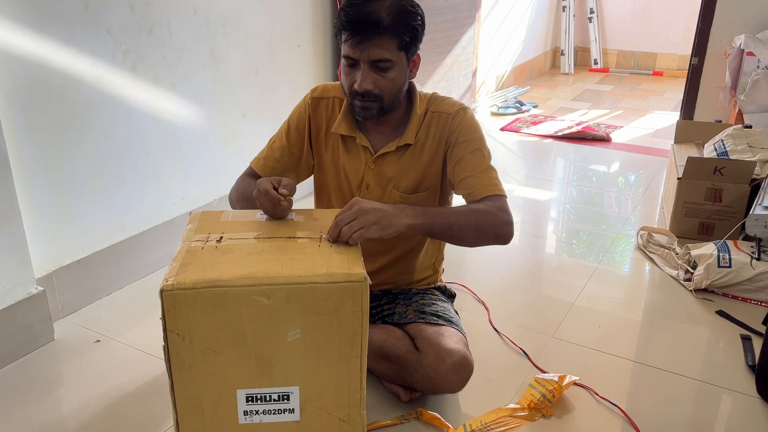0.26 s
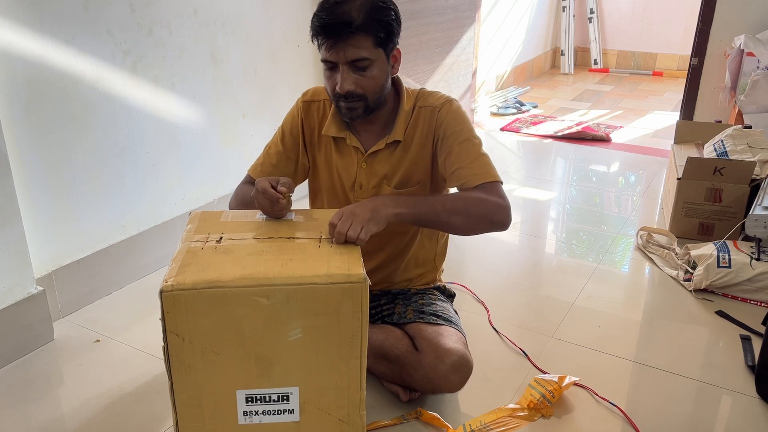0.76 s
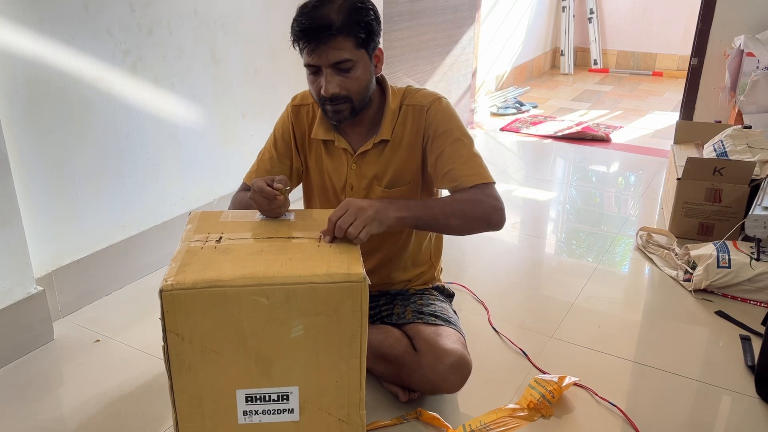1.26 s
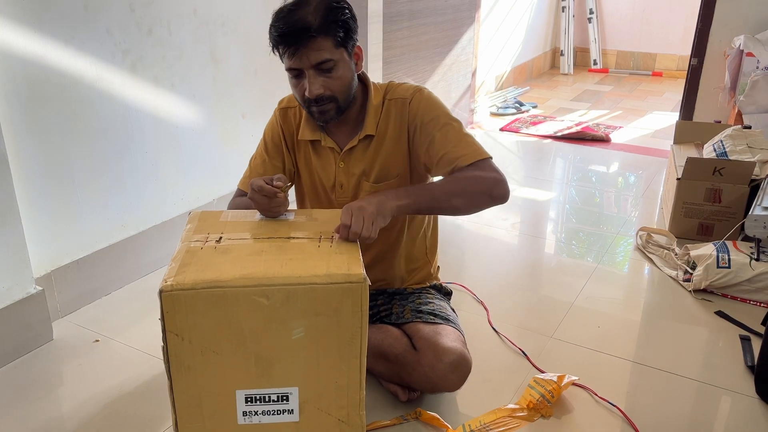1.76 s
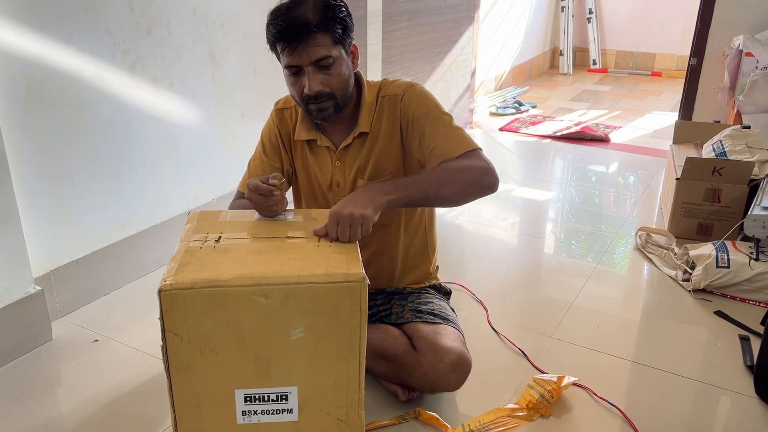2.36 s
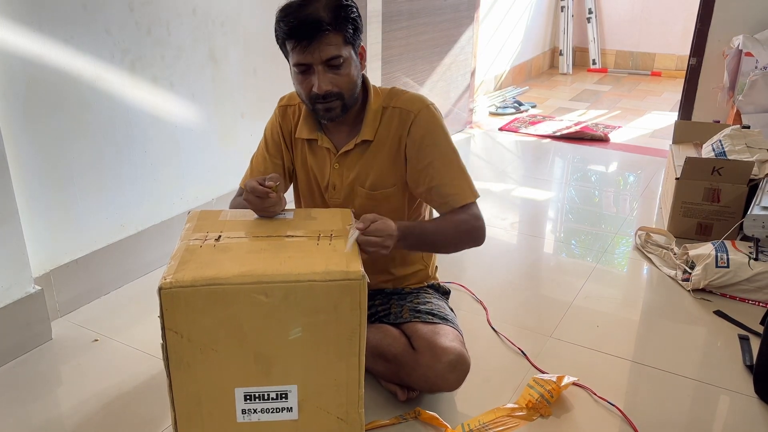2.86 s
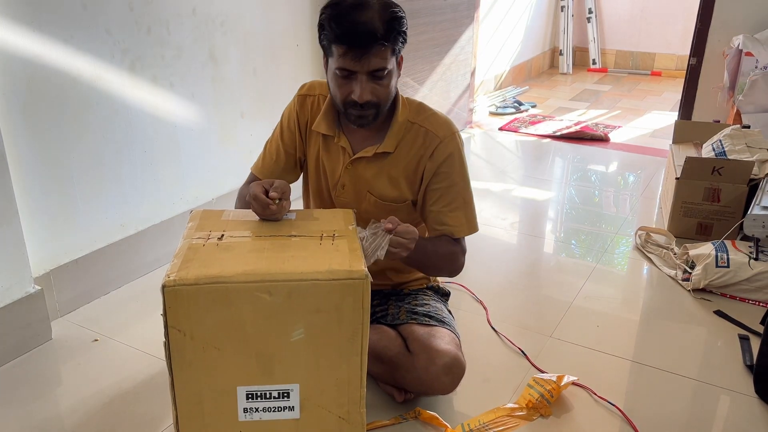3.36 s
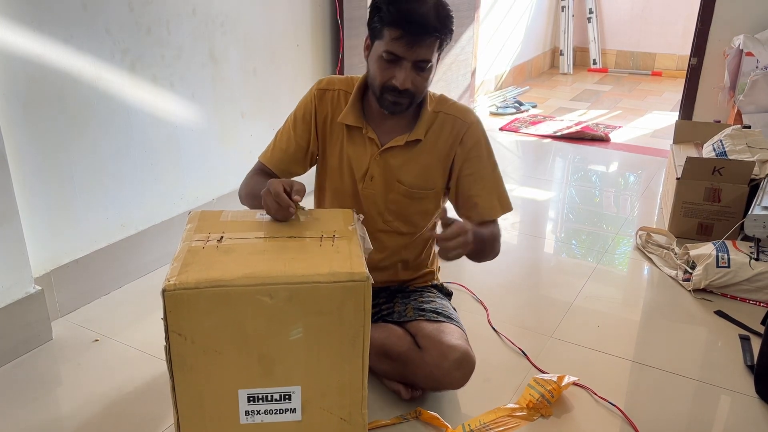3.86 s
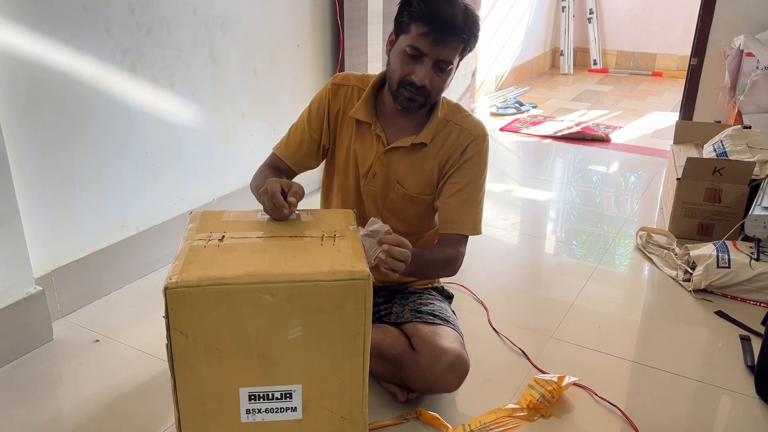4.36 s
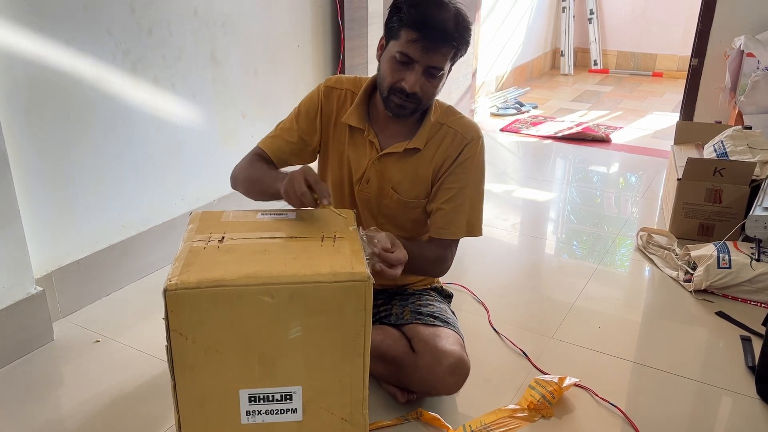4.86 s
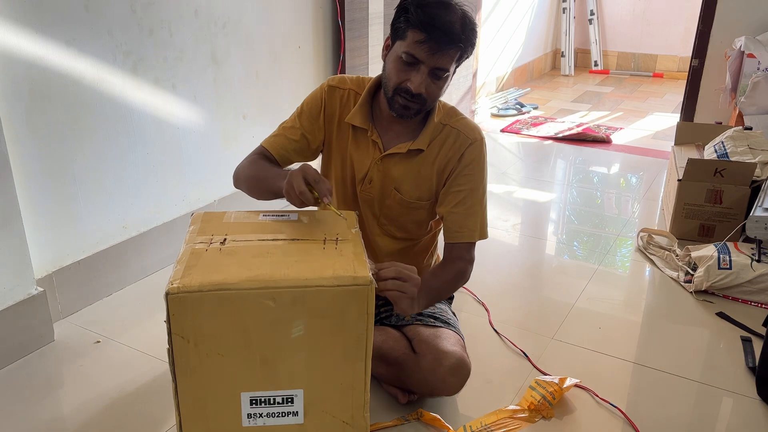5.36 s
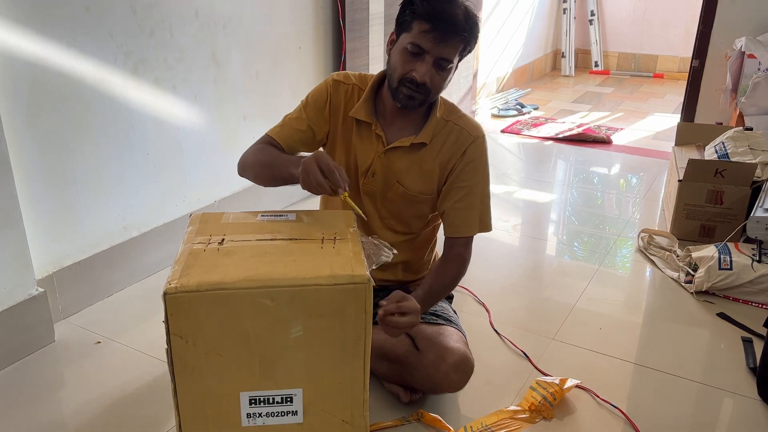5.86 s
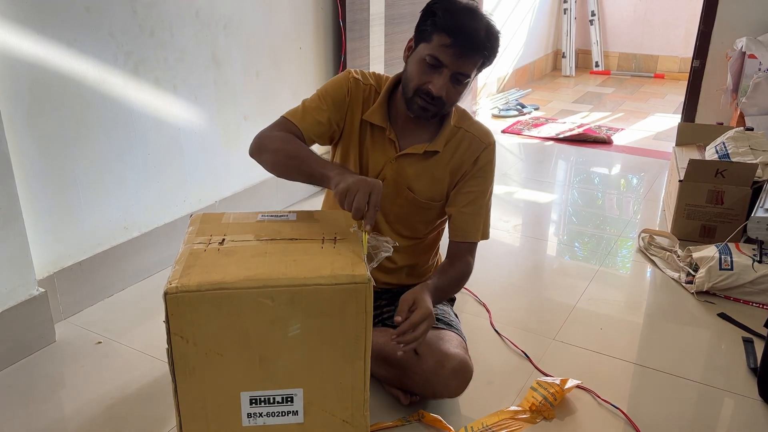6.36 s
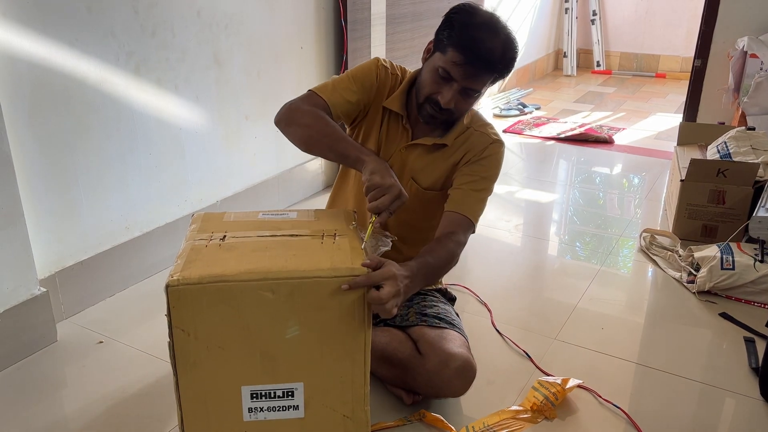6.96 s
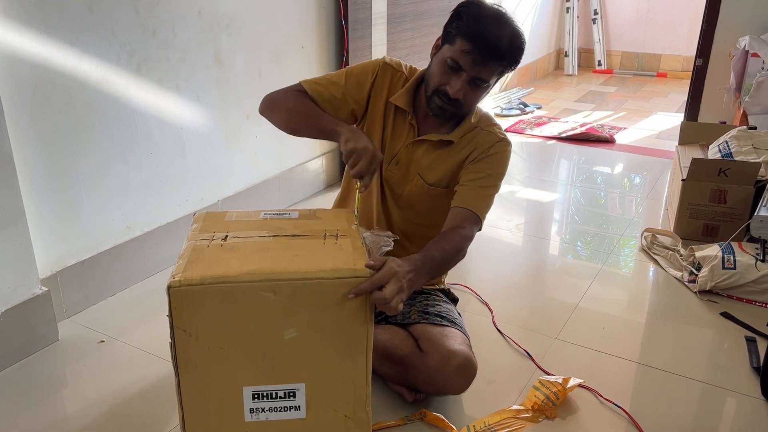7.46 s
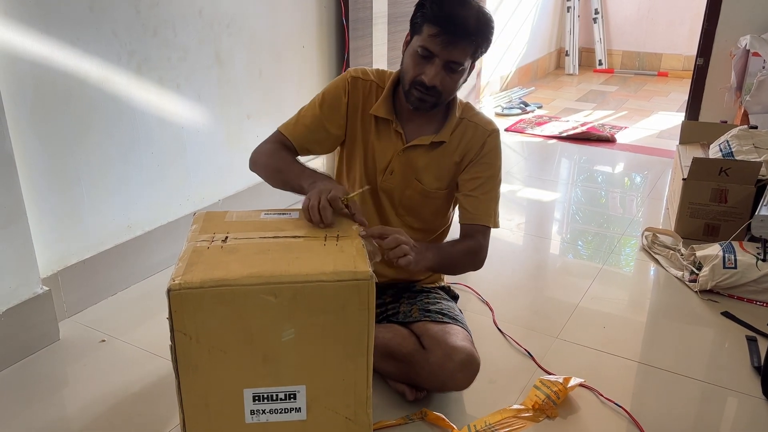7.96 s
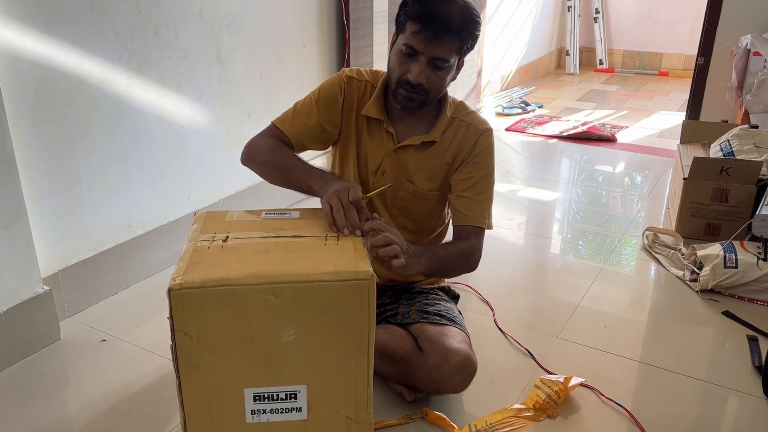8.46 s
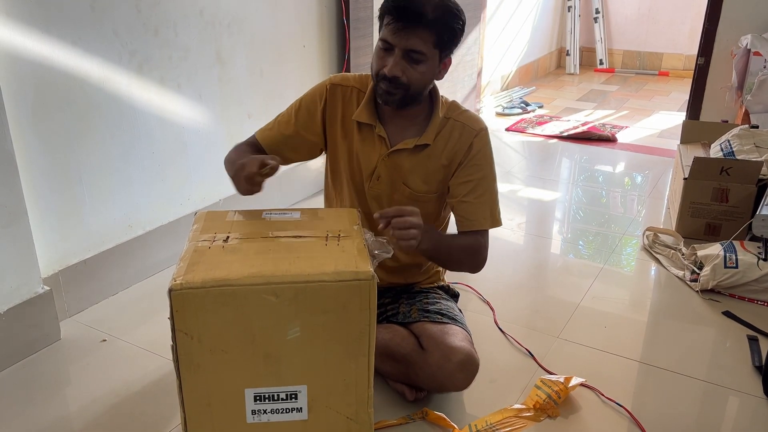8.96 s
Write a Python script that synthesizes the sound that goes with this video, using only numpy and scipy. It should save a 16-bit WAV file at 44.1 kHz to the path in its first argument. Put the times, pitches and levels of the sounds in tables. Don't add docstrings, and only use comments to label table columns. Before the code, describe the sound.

Packing tape crackles and snaps off a large hollow cardboard box in a bare tiled room, with muffled street traffic and a late horn.

```python
import sys
import numpy as np
from scipy import signal
from scipy.fft import rfft, irfft, next_fast_len
from scipy.io import wavfile
from scipy.ndimage import uniform_filter1d

SR = 44100
rng = np.random.default_rng(int(sys.argv[2]) if len(sys.argv) > 2 else 0)


def pcm_store(signal):
    levels = np.round(np.clip(np.atleast_2d(signal), -1, 1) * 32767)
    wavfile.write(sys.argv[1], SR, levels.astype(np.int16).T)


def volts_from_decibels(level):
    exponent = np.asarray(level, float) / 20
    return 10 ** exponent


N = 405896

# f/Hz, density/dB per Hz
STREET_SPECTRUM = [(25, -22), (48, -3), (90, -2), (140, -4), (220, -2.5), (440, -5.5), (680, -14),
                   (1100, -10), (1600, -14), (2900, -26.5), (4600, -29), (6500, -36.5), (9000, -38.5),
                   (16000, -58)]
# t/s, level/dB
TRAFFIC_RUMBLE = [
    (0, -4),
    (1, 0),
    (2, -0.5),
    (2.7, 1.5),
    (3.5, 0.5),
    (4.3, -3),
    (5, 2),
    (5.8, -2.5),
    (6.5, 0.5),
    (9.2, 0.5),
]
# start/s, end/s, first f/Hz, last f/Hz,
# level/dB
ENGINE_PASSES = [(0, 1.53, 100, 99.4, -50), (1.08, 1.38, 1121, 1119, -57),
                 (0.54, 1.67, 227.5, 228.2, -53.5), (1.57, 4.16, 100.2, 102.9, -48),
                 (2.4, 2.7, 88.2, 88, -42), (2.9, 3.3, 78, 76, -48), (5.45, 6.25, 75, 77, -46),
                 (6.65, 7.5, 79, 90, -46), (6.9, 7.4, 100, 102, -49), (7.05, 8.05, 118, 122, -47),
                 (7.45, 8.35, 160, 160, -50), (8.15, 8.6, 120, 98, -46), (7, 10.4, 225.8, 225.6, -51.5),
                 (8.5, 9.6, 65.7, 55.4, -46)]
# t/s, flap level/dB, ring f/Hz, fizz level/dB
FILM_TICKS = [(0.097, -59, 1310, -48), (0.5227, -46, 1960, -44), (0.6536, -36.5, 4300, -32),
              (0.68, -40, 4720, -26), (0.708, -36, 4500, -28), (0.712, -31, 6480, -27),
              (0.737, -38, 4500, -27), (0.766, -38, 4500, -25), (0.768, -47, 4500, -26),
              (0.7758, -36, 4000, -24), (0.7805, -29, 4530, -20.5), (0.785, -33, 3000, -34),
              (0.8074, -36, 4500, -34), (0.789, -37, 3000, -40), (1.433, -59, 2070, -41.5),
              (1.546, -43, 4150, -37), (1.595, -32, 4250, -25), (1.6, -22, 4400, -16.5),
              (1.705, -47, 5400, -34), (1.7405, -28, 2500, -22), (2.351, -54, 5000, -39),
              (2.362, -44, 4600, -41), (2.4668, -25, 4050, -26), (2.4812, -30, 4960, -28),
              (2.489, -23, 5660, -27), (2.4925, -27, 6500, -32), (2.5155, -29, 3980, -30),
              (2.546, -34, 4500, -21), (2.6034, -35, 5000, -20.5), (3.025, -40, 1299, -42),
              (4.2378, -40, 1310, -37), (3.6138, -18.5, 4700, -29), (4.35, -25, 2860, -19.5),
              (4.6655, -39, 1720, -39), (4.905, -40.5, 1870, -47), (5.033, -34, 4140, -36),
              (7.164, -35, 4650, -31), (7.1707, -26, 2620, -30), (7.188, -32, 4300, -40),
              (7.2453, -33, 3980, -31), (7.248, -37, 3830, -46), (7.798, -43, 4900, -42)]
# t/s, flap level/dB, ring f/Hz, fizz level/dB, box level/dB
BOND_SNAPS = [(0.7344, -27, 5200, -39, -32), (0.801, -30.5, 6300, -42, -51), (1.599, -35.5, 2570, -49, -43),
              (1.7368, -27.5, 5630, -35, -33), (2.4766, -25.5, 4120, -44, -31),
              (2.5118, -28, 3960, -37, -29.5), (2.5206, -30, 4070, -26, -39), (2.5316, -25, 4600, -33, -51),
              (2.5411, -21.5, 4070, -39, -25), (2.565, -27, 3900, -40, -36), (3.144, -16, 1980, -30, -20),
              (2.6007, -23.5, 4600, -41, -44), (3.1165, -22, 3030, -20, -34), (3.125, -21, 3060, -25, -44),
              (3.135, -23, 2200, -34, -41), (3.1413, -13, 2140, -23, -18), (3.175, -34, 2580, -42, -40),
              (3.229, -13.5, 2600, -21, -23), (3.245, -16.5, 1200, -27, -19.5),
              (3.2502, -22, 2000, -28, -39), (3.254, -15, 2000, -30, -24), (3.2712, -16, 3150, -29, -23.5),
              (3.2771, -14, 2300, -34, -41), (3.284, -22, 3750, -32, -29), (3.3013, -26, 4400, -25, -23),
              (3.313, -24, 1610, -30, -43), (3.6137, -19.5, 2020, -27, -28), (4.28, -28, 1440, -29, -50),
              (4.292, -22, 2420, -43, -33), (4.3215, -16.5, 3900, -28, -37), (4.3303, -28, 5000, -34, -32),
              (4.3363, -27, 3920, -40, -34), (4.3461, -21.5, 2550, -25, -20),
              (5.2721, -23, 4060, -30, -29.5), (7.046, -35, 4500, -38, -31),
              (7.1478, -31.5, 1490, -47, -48), (7.1826, -25, 1390, -33, -29.5),
              (7.2367, -30, 1420, -46, -49), (7.2955, -41.5, 1800, -44, -26),
              (8.5068, -22.5, 1570, -32, -44)]
# t/s, flap level/dB, ring f/Hz, box level/dB
SEAM_CREAKS = [(0.705, -47.5, 1720, -37), (1.624, -54, 4330, -55), (1.696, -39, 5360, -51),
               (1.719, -44, 4840, -51), (2.345, -50, 4100, -48), (3.206, -46.5, 4500, -59),
               (3.3457, -43, 4220, -54), (4.159, -46, 1310, -39.5), (5.769, -51, 1700, -34.5),
               (4.508, -36.5, 2480, -50), (4.64, -43.5, 3900, -59), (4.687, -39, 3780, -53.5),
               (4.7291, -38.5, 5200, -59.5), (4.786, -34.5, 2000, -47), (5.081, -58, 1310, -41),
               (5.231, -37, 4800, -53.5), (5.27, -26.5, 1800, -56), (5.715, -53, 4800, -47),
               (6.275, -39.5, 1310, -60), (6.29, -56, 4610, -40), (6.433, -63, 3900, -84),
               (6.8427, -42.5, 4440, -51), (6.8985, -43.5, 1370, -48.5), (7.1523, -38, 4640, -46),
               (7.174, -39, 4130, -52), (7.2418, -36, 4350, -51), (7.3861, -44.5, 1310, -28.5),
               (7.789, -44, 1340, -42), (7.865, -46, 1310, -51), (8.3623, -39.5, 2570, -57),
               (8.698, -46, 3740, -43), (8.782, -51, 1580, -37)]
# t/s, fizz level/dB
FILM_CRINKLES = [(2.77, -50), (2.826, -52), (2.885, -49), (4.512, -43), (4.561, -45), (4.6, -49),
                 (4.683, -38), (4.731, -50), (5.718, -48), (5.791, -49), (6.062, -48), (6.77, -54),
                 (7.077, -44), (7.42, -48), (8.284, -54), (8.364, -44)]
# start/s, hardest/s, end/s
RIP_TIMES = [(.765, .768, .773), (.776, .783, .792), (.801, .806, .812), (2.505, 2.53, 2.54),
             (2.541, 2.566, 2.596), (2.599, 2.604, 2.625), (2.692, 2.706, 2.747), (2.78, 2.93, 3.02),
             (3.1172, 3.12, 3.126), (3.1255, 3.129, 3.142), (3.244, 3.25, 3.262), (3.27, 3.284, 3.3),
             (3.3, 3.314, 3.335), (3.603, 3.611, 3.613), (4.251, 4.273, 4.279), (4.2795, 4.291, 4.297),
             (4.3217, 4.33, 4.341), (5.232, 5.236, 5.268), (6.28, 6.3, 6.35), (7.19, 7.2, 7.225),
             (7.264, 7.293, 7.37), (8.494, 8.5, 8.506)]
# level/dB, box level re the pull/dB
RIP_FORCES = [(-33, -22), (-29.5, -16), (-40, -18), (-37, -11), (-24.5, -12), (-34.5, -16), (-35.5, -22.5),
              (-51, -17.5), (-20, -11), (-16, -18), (-18, -5), (-21, -10), (-27.5, -11), (-42, -13),
              (-34.5, -20), (-24.5, -10), (-20, -2), (-40, -15), (-53.5, -8), (-53, -5), (-55, 8),
              (-38, -16)]
# t/s, stretch of its rings/ratio, small panel re the hollow/dB
FLAP_HOLD = [(0.7, 1.03, 2), (1.7, 1, 5), (2.5, 1.04, -3), (3.13, 1.01, -2), (3.2, 1.26, 2),
             (3.23, 0.96, -23), (3.35, 1.08, -14), (3.6, 1, -8), (4.28, 1.046, 3), (4.4, 1.02, 10),
             (5.2, 0.89, 3), (7.2, 1.06, -5.5), (8.5, 1.05, 5)]
# f/Hz, width/Hz, level/dB
FLAP_RINGS = [(1410, 28, 4.5), (1970, 960, -2), (3200, 730, -9), (4150, 880, -4), (6530, 3500, -12.5)]
# f/Hz, width/Hz, level/dB
BOX_AIR = [(292, 120, -8), (479, 320, 13.5), (565, 51, -0.5)]
# f/Hz, width/Hz, level/dB
SMALL_PANEL = [(930, 770, 6.5), (1160, 340, -14)]
# t/s, peak level/dB, panel f/Hz, decay/s
BOX_BUMPS = [(1.736, -20.5, 296, 0.0079), (2.559, -30.5, 507, 0.034), (3.169, -17, 570, 0.0056),
             (3.272, -21, 450, 0.0096), (3.301, -14.5, 472, 0.0086), (3.308, -22.5, 295, 0.011),
             (3.617, -25.5, 119, 0.035), (4.347, -17.5, 556, 0.0072), (4.362, -16, 875, 0.0068),
             (4.281, -28, 1433, .022), (4.328, -30, 1020, 0.0068), (5.273, -35, 4250, 0.026),
             (5.277, -32, 4300, 0.035), (4.951, -43, 197, 0.01), (5.769, -24.5, 393, 0.0129),
             (6.928, -22, 376, 0.0074), (7.199, -20.5, 330, 0.01), (7.229, -26, 360, 0.023),
             (7.3, -47, 269, 0.014), (7.386, -27, 282, 0.02), (8.298, -27, 130.6, 0.0164)]
# multiple of the fundamental, level/dB, build-up/s
HORN_PARTIALS = [(7, -48, .035), (8, -43, .03), (9, -39, .014), (10, -34, .036), (11, -52, .04),
                 (18, -68, .04), (19, -63, .04), (20, -62, .04), (25, -52, .03), (26, -55, .03),
                 (31, -60, .03)]
# f/Hz, T60/s, level/dB
ROOM_DECAY = [(200, 0.43, -2.5), (800, 0.5, 2), (2000, 0.56, -4.5), (5000, 0.52, -2), (14050, 0.44, -5)]
# delay/s, level/dB, top f/Hz
EARLY_BOUNCES = [
    (.0043, -8, 12000),
    (.0085, -21, 6000),
]
# f/Hz, likeness/0-1, phase of right re left/rad, left minus right/dB
STEREO_PAIR = [(60, .95, -.1, -1), (170, .94, -.2, -2.5), (350, .85, -.35, -2.1), (1000, .62, -.7, .8),
               (1700, .3, -.6, .6), (2500, .8, -.45, .6), (3900, .65, -.9, 2.5), (5200, .5, -.7, 2),
               (6000, .4, .9, .5), (7000, .6, 2.2, 0), (7750, .999, 3.14, 0), (9250, .999, 3.14, 0),
               (10200, .7, 4.9, 0), (11400, .995, 6.28, 0), (12700, .995, 6.28, 0), (13800, .7, 7.8, 0),
               (14500, .997, 9.42, 0), (17000, .999, 9.42, 0)]

STREET_DB, STREET_FOLLOWS = -37.5, 0.0167
PASS_S, PASS_WIDE_S, PASS_HZ, PASS_DB = 1.22, 0.08, 880, 4
TICK_S, SNAP_S, CREAK_S, CRINKLE_S = 0.0013, 0.0022, 0.0032, 0.0017
TICK_BUILD, BUILD = 0.29, 3.3
TICK_BOX_DB, CREAK_FIZZ_DB = -9, -13
CREAK_MEAN_DB, CREAK_BRIGHTENS = -41, 0.23
CRINKLE_HZ, CRINKLE_FLAP_DB = 6000, -3
PULL_DB, SLACK_DB = -3, -7.5
RIP_FIZZ_DB, DULL_PER_BOX_DB, DULL_PER_DB = 1, 2, 0.6155
HORN_S, HORN_HZ = 9.143, 367.7
ALIKE_HZ, APART_HZ = 8100, 15300
TOP_ALIKE, SHARP_TOP_ALIKE = .9995, .97


def evened(x):
    return x / np.sqrt(np.mean(x ** 2) + 1e-20)


def read(points, hz, order=1):
    table = np.transpose(points)
    return np.interp(np.log(hz + 1), np.log(table[0] + 1), table[order])


def ring(x, hz, width):
    return signal.lfilter(*signal.iirpeak(hz, hz / width, SR), x)


def body(x, modes):
    return sum(volts_from_decibels(db) * ring(x, hz, width) for hz, width, db in modes)


def fizz(x, edge_hz=6500):
    return signal.sosfilt(signal.butter(2, edge_hz, "high", fs=SR, output="sos"), x)


def street():
    frames, hz = N // 256 + 5, np.fft.rfftfreq(1024, 1 / SR)
    frame_s = np.arange(frames) * 256 / SR
    a, b, c, d, patches = rng.standard_normal((frames, 513, 5)).T
    patches = uniform_filter1d(patches, size=14, axis=0)
    patches = evened(uniform_filter1d(patches, size=12, axis=1))
    flutter = evened(uniform_filter1d(rng.standard_normal(frames), size=6))
    s, rumble_db = np.transpose(TRAFFIC_RUMBLE)
    rumble = np.interp(frame_s, s, rumble_db) / (1 + (hz[:, None] / 120) ** 4)
    off_time = (frame_s - PASS_S) / PASS_WIDE_S
    off_pitch = np.log(hz[:, None] / PASS_HZ + .01)
    passing = PASS_DB * np.exp(-off_time ** 2 - off_pitch ** 2)
    db = read(STREET_SPECTRUM, hz)[:, None] + rumble + passing + 1.38 * patches + 0.065 * flutter
    z = np.array([a + 1j * b, c + 1j * d]) * volts_from_decibels(db)
    noise = signal.istft(z, nperseg=1024, noverlap=768)[1][:, :N]
    level_db = np.interp(np.arange(N) / SR, s, STREET_DB + STREET_FOLLOWS * rumble_db)
    return volts_from_decibels(level_db) * evened(noise)


def engines():
    out, t = np.zeros(N), np.arange(N) / SR
    phases = rng.random((len(ENGINE_PASSES), 2))
    for (s0, s1, hz0, hz1, db), (p, q) in zip(ENGINE_PASSES, phases):
        u = np.clip((t - s0) / (s1 - s0), 0, 1)
        hz = hz0 + (hz1 - hz0) * u + 1.1 * np.sin(2 * np.pi * (4.8 * t + p))
        throb_db = 4.0 * np.sin(2 * np.pi * (5.1 * t + q))
        swell = np.minimum(3.9 * np.sin(np.pi * u), 1) * volts_from_decibels(throb_db)
        out += volts_from_decibels(db + 1.5) * swell * np.sin(2 * np.pi * np.cumsum(hz) / SR)
    return out


def every_snap():
    rows = [(s, db, hz, top_db, db + TICK_BOX_DB, TICK_S) for s, db, hz, top_db in FILM_TICKS]
    rows += [(*row, SNAP_S) for row in BOND_SNAPS]
    for s, db, hz, box_db in SEAM_CREAKS:
        fizz_db = db + CREAK_FIZZ_DB + CREAK_BRIGHTENS * (db - CREAK_MEAN_DB)
        rows.append((s, db, hz, fizz_db, box_db, CREAK_S))
    for s, db in FILM_CRINKLES:
        rows.append((s, db + CRINKLE_FLAP_DB, CRINKLE_HZ, db, db + TICK_BOX_DB, CRINKLE_S))
    return rows


def grains(shape, share, spread_db):
    size = volts_from_decibels(spread_db * np.minimum(rng.exponential(1, shape), 4))
    return size * rng.standard_normal(shape) * (rng.random(shape) < share)


def flattened(x, share=0.46):
    z = rfft(x)
    return irfft(z / (abs(z) + share * abs(z).mean()), x.shape[-1])


def held(s):
    at, stretch, panel_db = np.transpose(FLAP_HOLD)
    return np.array(FLAP_RINGS) * [np.interp(s, at, stretch), 1, 1], np.interp(s, at, panel_db)


def hollow(x, panel_db, edge_hz=230, top_hz=720):
    air = signal.sosfilt(signal.butter(3, top_hz, fs=SR, output="sos"), body(x, BOX_AIR))
    both = air + volts_from_decibels(panel_db) * body(x, SMALL_PANEL)
    return signal.sosfilt(signal.butter(3, edge_hz, "high", fs=SR, output="sos"), both)


def snaps():
    out, t = np.zeros((2, N + 2000)), np.arange(2000) / SR
    for s, db, hz, fizz_db, box_db, length in every_snap():
        build = BUILD if length > TICK_S else TICK_BUILD
        fall = np.minimum(t / 0.00037, 1) * (1 + build * t / length) * np.exp(-(t / length) ** 2)
        slips = flattened(grains((2, 2000), .6, 0.54) * fall) * fall ** 0.063
        flap, panel_db = held(s)
        bent = flap * [rng.uniform(1.0, 1.0246), 1, 1]
        tape = body(slips, bent) + 1.44 * ring(slips, hz, 0.17 * hz)
        tape = fizz(tape, 0.29 * hz)
        parts = [(tape, db + 3.5, length),
                 (fizz(slips), fizz_db + 2.5, length),
                 (hollow(slips, panel_db), box_db - 6.0, length + 0.0076)]
        at = round(s * SR)
        for part, part_db, lasts in parts:
            unit = part / np.linalg.norm(part, axis=1, keepdims=True)
            out[:, at:at + 2000] += volts_from_decibels(part_db) * np.sqrt(lasts * SR) * unit
    return out[:, :N]


def rips():
    clumps = volts_from_decibels(2.0 * evened(uniform_filter1d(rng.standard_normal(N), size=90)))
    slips = grains((2, N), 0.073, 1.7) * clumps
    out, t = np.zeros((2, N)), np.arange(N) / SR
    for s, (top_db, box_db) in zip(RIP_TIMES, RIP_FORCES):
        on = slice(round(s[0] * SR), round(s[-1] * SR))
        flap, panel_db = held(s[1])
        run = slips[:, on.start - 1000:on.stop]
        layers = body(run, flap), fizz(run), hollow(run, panel_db)
        tape, top, thump = (evened(p[:, 1000:]) for p in layers)
        db = top_db + np.interp(t[on], s, [PULL_DB, 0, SLACK_DB])
        fizz_db = RIP_FIZZ_DB - DULL_PER_BOX_DB * (box_db + 26.0) - DULL_PER_DB * (db + 33.0)
        mix = tape + volts_from_decibels(fizz_db) * top + volts_from_decibels(box_db) * thump
        out[:, on] += volts_from_decibels(db - 1.0) * signal.windows.tukey(len(db), .04) * mix
    return out


def bumps():
    out, t = np.zeros(N + 6000), np.arange(6000) / SR
    for s, db, hz, decay in BOX_BUMPS:
        swing = np.sin(2 * np.pi * hz * t) + 0.27 * np.sin(2 * np.pi * 1.6 * hz * t)
        push = np.minimum(t / 0.0023, 1) * np.exp(-t / decay)
        out[round(s * SR):][:6000] += volts_from_decibels(db - 4.5) * push * swing
    return out[:N]


def horn():
    t = np.maximum(np.arange(N) / SR - HORN_S, 0)
    turns = HORN_HZ * (t + .0002 * np.exp(-t / .015))
    shake = rng.standard_normal((len(HORN_PARTIALS), N))
    shake = .45 * evened(uniform_filter1d(shake, size=200, axis=1))
    out = volts_from_decibels(-51.5) * np.minimum(t / 0.019, 1) * evened(fizz(rng.standard_normal(N)))
    for (k, db, rise), wobble in zip(HORN_PARTIALS, shake):
        out += volts_from_decibels(db + 1.0) * np.minimum(t / rise, 1) ** 3 * np.sin(2 * np.pi * k * turns + wobble)
    return out


def room(x):
    taps = np.zeros((2, SR))
    at = np.arange(300, SR - 20, 20) + rng.integers(0, 20, (2, (SR - 301) // 20))
    np.put_along_axis(taps, at, rng.choice([-1., 1.], at.shape), 1)
    taps *= np.clip((np.arange(SR) / SR - .008) / 0.0018, 0, 1)
    hz, t, z = signal.stft(taps, SR, nperseg=256)
    decay_db = read(ROOM_DECAY, hz, order=2)[:, None] - 60 * t / read(ROOM_DECAY, hz)[:, None]
    tail = volts_from_decibels(-17.5) * signal.istft(z * volts_from_decibels(decay_db), SR, nperseg=256)[1]
    for s, db, top_hz in EARLY_BOUNCES:
        dull = np.exp(-2 * np.pi * top_hz * np.arange(40) / SR)
        start = round(s * SR)
        tail[:, start:start + 40] += volts_from_decibels(db) * dull / dull.sum()
    return signal.fftconvolve(x, tail, axes=1)[:, :N]


def ports(fields, near=0.9556, top_near=TOP_ALIKE, blur=1.86):
    size = next_fast_len(N + 2048)
    hz, (shared, own) = np.fft.rfftfreq(size, 1 / SR), rfft(fields, size)
    low = 1 / (1 + (hz / ALIKE_HZ) ** 12)
    edge = 1 / (1 + (APART_HZ / (hz + 1)) ** 24)
    alike = top_near + (near - top_near) * np.maximum(low, edge)
    same = np.clip(alike * read(STEREO_PAIR, hz) ** blur, 0, 1)
    tilt = volts_from_decibels(read(STEREO_PAIR, hz, order=3) / 2)
    turn = np.exp(1j * read(STEREO_PAIR, hz, order=2))
    right = same * turn * shared + np.sqrt(1 - same ** 2) * own
    return irfft(np.array([shared * tilt, right / tilt]), size)[:, :N]


def scene():
    sharp, spread = snaps() + bumps(), rips()
    direct = ports(sharp, near=0.7, top_near=SHARP_TOP_ALIKE)
    diffuse = spread + room(sharp + spread) + street() + engines() + horn()
    return direct + ports(diffuse, near=1.0)


def roll_off(x):
    return signal.sosfilt(signal.butter(12, 16500, fs=SR, output="sos"), x)


def record(dry):
    cut = signal.sosfilt(signal.butter(2, 38, "high", fs=SR, output="sos"), dry)
    cut = 1.1 * np.tanh(cut / 1.1)
    edge = signal.firwin(511, 15950, window=("kaiser", 8), fs=SR)
    return roll_off(signal.oaconvolve(cut, edge[None], "same"))


dry = scene()
out = record(dry)
pcm_store(out)
```